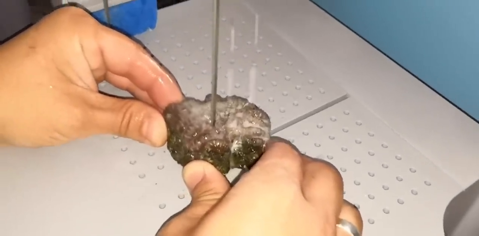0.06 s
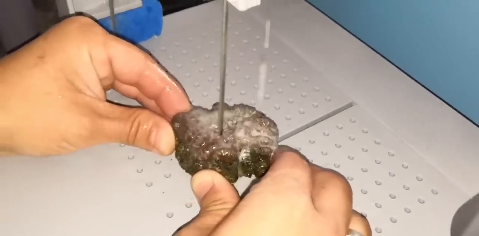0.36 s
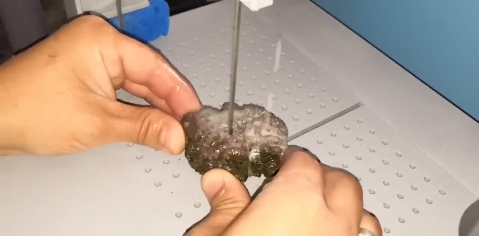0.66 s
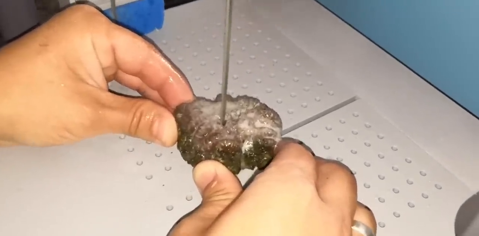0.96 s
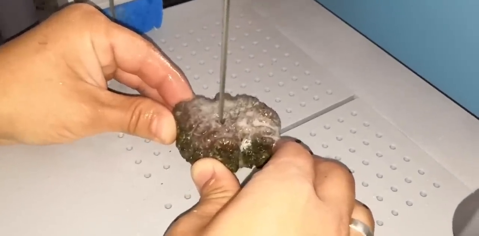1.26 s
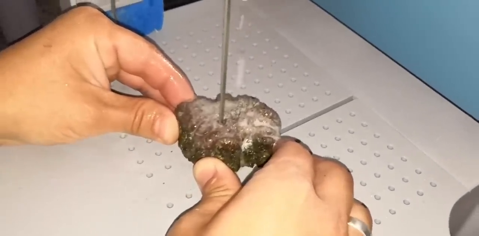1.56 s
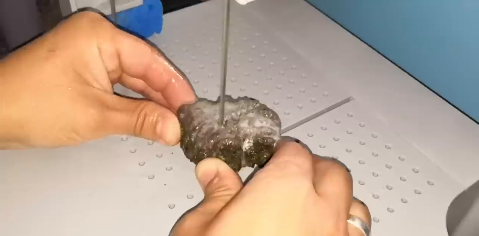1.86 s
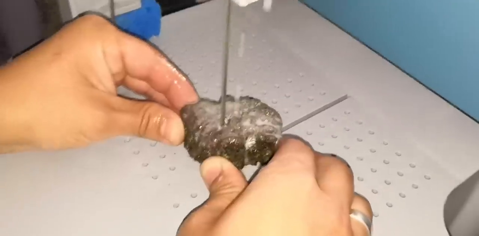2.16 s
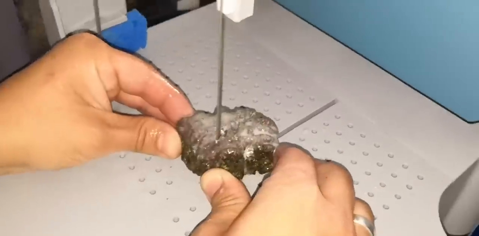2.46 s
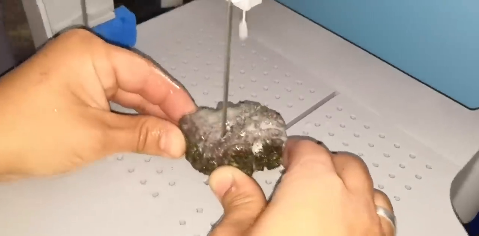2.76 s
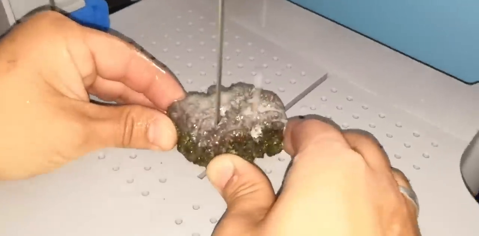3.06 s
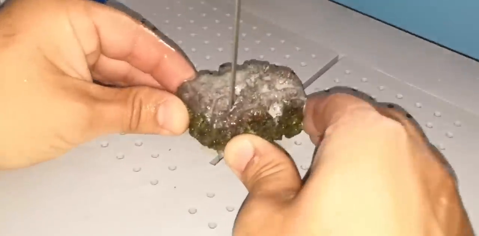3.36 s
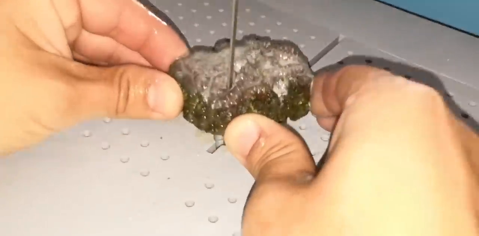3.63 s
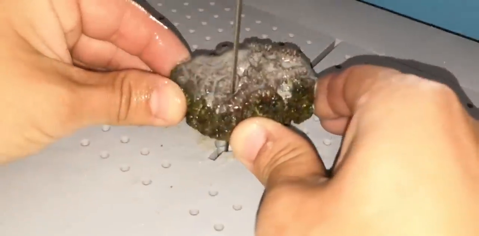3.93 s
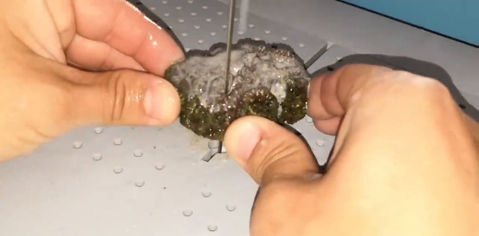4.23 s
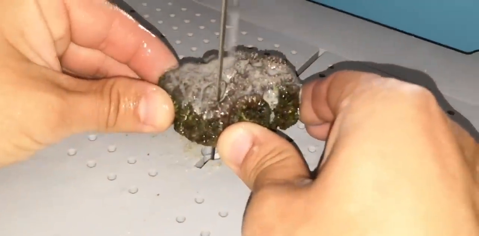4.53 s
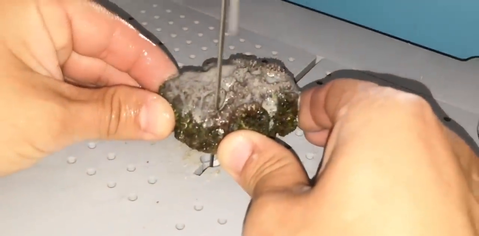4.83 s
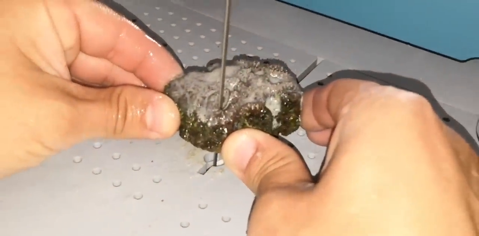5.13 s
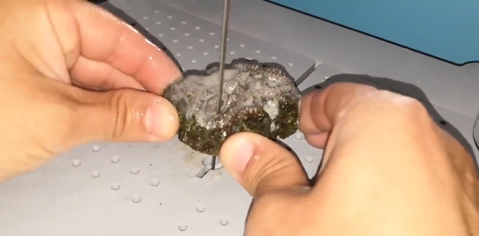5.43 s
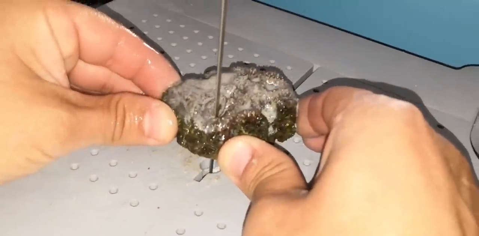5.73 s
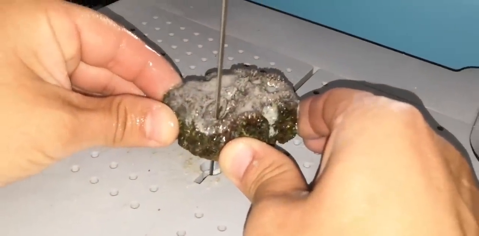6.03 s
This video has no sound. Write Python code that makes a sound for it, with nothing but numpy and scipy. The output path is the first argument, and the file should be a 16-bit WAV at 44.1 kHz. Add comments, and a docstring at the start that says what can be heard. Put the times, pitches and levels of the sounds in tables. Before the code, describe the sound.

Continuous gritty hiss of a water-cooled bandsaw cutting a piece of coral, with a pulsing low hum underneath.

```python
"""A water-cooled diamond bandsaw grinds through a piece of coral that two hands feed along the table. The band
laps ten to eleven times a second: its kinks shake the frame into a throbbing drone, and its high spots make the
gritty grinding hiss flutter. Band, coral and table ring in the hiss, whose colour changes as the band enters
and bites, and once more later on. Behind it sit the rumble of the housing, a faint spray of cooling water and
the hum of the motor."""
import sys
import numpy as np
from scipy import signal
from scipy.fft import rfft, irfft, next_fast_len
from scipy.io import wavfile
from scipy.ndimage import uniform_filter1d

SR = 44100
rng = np.random.default_rng(int(sys.argv[2]) if len(sys.argv) > 2 else 0)


def master_out(mix):
    """Clip the mix to full scale and print it as 16-bit PCM to the path in sys.argv[1]."""
    frames = np.transpose(np.atleast_2d(mix))
    ceiling = np.clip(frames, -1, 1)
    pcm = np.round(ceiling * 32767).astype(np.int16)
    wavfile.write(sys.argv[1], SR, pcm)


N = 277423
TIME = np.arange(N) / SR
FFT_SIZE = next_fast_len(N)
BINS_HZ = np.maximum(np.arange(FFT_SIZE // 2 + 1) * SR / FFT_SIZE, 1)

# partials of the motor hum: (harmonic number, rms level [dB])
HUM_PARTIALS = [(1, -60), (4, -70), (6, -66)]
# tone of the water spraying off the band: (frequency [Hz], relative level [dB])
SPRAY_EQ = [(1500, -10), (5000, 4.5), (9500, -32), (11300, 2), (15000, 0)]
# tone of the housing's rumble: (frequency [Hz], relative level [dB])
HOUSING_EQ = [(20, -19), (45, -18.5), (75, -15), (115, -16), (145, -2), (185, 3), (235, -1), (270, -7),
              (310, 2.5), (350, -11.5), (420, -48), (900, -48)]
# speed of the band: (time [s], speed [laps/s])
BAND_SPEED = [(0.0, 9.806), (0.28, 10.077), (1.39, 10.152), (1.95, 9.828), (2.33, 10.549), (2.44, 10.458),
              (3.8, 11.471), (4.09, 11.184), (5.67, 11.01), (6.29, 11.127)]
# how hard the feed shakes the saw, a fader on drone and rumble: (time [s], relative level [dB])
FEED_FADER = [(0, -38.5), (1.4, -37), (1.95, -38.5), (2.15, -37.5), (2.3, -35), (2.8, -37), (3.36, -39),
              (3.7, -38), (3.96, -36), (4.71, -36.5), (5.3, -34.5), (5.95, -41), (6.29, -38)]
# kinks in the band that push the frame: (position [laps], entering [dB], biting [dB], deep [dB])
BAND_KINKS = [(.121, .8, -2.6, -5.3), (.146, .2, -1.7, -2.8), (.235, -12.9, -9.2, -15.8),
              (.497, -14.3, -10.2, -4.8), (.593, -19.8, -8.6, -5.3), (.713, -45, -11.5, -18.6),
              (.787, -12.3, -18.4, -14.1)]
# ringing modes of the saw's frame: (frequency [Hz], width [Hz], relative level [dB])
FRAME_MODES = [(165, 37.8, -9.4), (186.9, 14.6, 0), (231.9, 14, -13), (305, 29.7, -20.5)]
# spots on the band that rub harder: (position [laps], width [laps], entering [dB], biting [dB], deep [dB])
BAND_HIGH_SPOTS = [(.27, .05, 2.9, 2.7, 3.9), (.5, .03, 2.0, 1.8, 3.0), (.67, .05, .4, 2.4, 2.9),
                   (.78, .04, 1.9, .7, 1.3)]
# fader on the grinding hiss: (time [s], level [dB])
HISS_FADER = [(0, -35), (.35, -35), (.92, -35), (1.46, -35), (1.54, -34.5), (1.97, -35), (2.1, -35),
              (2.4, -34.5), (2.9, -33.5), (3.8, -35), (4.1, -34.5), (4.7, -35.2), (6.29, -34.5)]
# base tone of the wet grinding: (frequency [Hz], left relative level [dB], right relative level [dB])
GRINDING_EQ = [(452, -17, -13), (483, -18, -16), (506, -11, -11.5), (765, -13.5, -16), (814, -31, -22.5),
               (1020, -22, -20.5), (1340, -25, -17), (1590, -23.5, -19), (3260, -17, -19), (3620, -16, -14),
               (4890, -8, -8), (5350, -14, -13), (6520, -14.5, -7), (8000, -18, -12.5), (9390, -12, -14),
               (10540, -22.5, -31), (11250, -24, -29), (15000, -30, -34)]
# stereo image of the grinding between the resonances: (frequency [Hz], left-right correlation)
GRINDING_IMAGE = [(340, 0.63), (440, -0.0023), (780, 0.025), (1000, -0.39), (1450, 0.95), (2000, 0.4),
                  (3450, 0.11), (4300, 0.02)]
# resonances and hollows of band, coral and table, one set as the band enters, one as it bites, one for the
# later colour: (frequency [Hz], width [Hz], left gain [dB], right gain [dB], left-right correlation)
ENTERING_RESONANCES = [(650, 87, 0.8, 7.5, 0.27), (984, 100, -7, -13.5, 0.44), (1050, 236, 8, 14, 0.72),
                       (1240, 190, 10.5, 3.5, 0.72), (1700, 87, 9.5, 13, 0.15),
                       (2216, 610, 7.5, 8.5, -0.061), (2554, 110, 5.5, 17, 0.57),
                       (2930, 452, 6.5, 2.2, 0.2), (3410, 61, 1.5, 8, 0.46), (4390, 117, -13, 8.5, -0.03),
                       (5030, 860, -3, 0, 0.01), (5680, 670, -0.5, 14, 0.41), (6750, 470, 8, 2, 0.04),
                       (7470, 610, 5.8, 9.5, -0.07), (8860, 820, 6.5, 3, 0.065),
                       (9040, 450, -1, -13, -0.16), (10464, 380, 7.5, 11, -0.06)]
BITING_RESONANCES = [(700, 340, 0.1, 4, 0.13), (842, 128, 3.5, -1.5, -0.21), (1167, 290, 8.5, 3.5, 0.75),
                     (1685, 110, 8, 12.5, 0.03), (2185, 800, 10, 9, -0.23), (2526, 195, 5.5, 15, -0.018),
                     (3983, 170, -3, 6.5, -0.17), (4500, 90, 0.7, 7, 0.21), (4880, 1200, -3.5, -3, 0.15),
                     (5670, 1070, 5, 15.5, -0.047), (6380, 790, -3, -8, -0.13), (7170, 1130, 17, 15, -0.1),
                     (7140, 300, -11, -8, -0.03), (8700, 440, 9.5, -4, 0.05), (10500, 882, 11, 3, -0.03)]
LATE_RESONANCES = [(814, 203, 7.5, -8.5, -0.29), (880, 670, 4.5, 13.5, -0.35), (1220, 170, -1, 0, 0.76),
                   (1680, 30, -18, -7.5, 0.22), (1525, 1130, 11.5, 2, 0.25), (1680, 120, 2, 14, -0.56),
                   (2300, 340, 9, 13.5, 0.094), (2581, 153, 15.0, 16.5, -0.6), (2888, 200, 1, 3.6, 0.17),
                   (3410, 350, 2.5, 10, -0.042), (3710, 108, -2.0, -3, -0.16), (4130, 210, -3, 9, -0.32),
                   (4660, 177, 2.5, -1.5, 0.011), (5000, 130, -19, -3, -0.2), (5270, 390, 10, 8.5, -0.1),
                   (5845, 600, 8.8, 12, 0.00076), (7010, 440, 8, 8, -0.55), (7710, 830, 13.5, 10, -0.0095),
                   (8695, 380, 10.5, -3, 0.078), (9400, 281, 5.5, 0, -0.1), (10563, 720, 13.5, 4.5, -0.17)]
# resonances that ring in spurts: (frequency [Hz], width [Hz], depth [dB], rate [Hz])
CHATTER_BANDS = [(1700, 200, 2.5, 14), (2560, 340, 3.0, 34), (4450, 320, 2.5, 14), (5750, 800, 2.5, 24),
                 (7150, 1100, 2.5, 24)]
# single resonances swell or sink: (peak time [s], spread [s], frequency [Hz], width [Hz], gain [dB])
RESONANCE_RIDES = [(1.38, 0.19, 1100, 280, 5.5), (1.7, 0.22, 1200, 410, -4), (1.573, 0.056, 7450, 700, 4.5),
                   (1.9, 0.064, 2560, 220, 5), (2.145, 0.065, 4900, 420, 4), (3, 0.042, 6400, 480, 2),
                   (3.7, 0.33, 3350, 700, 2.5), (2.13, 0.09, 3200, 400, -4), (5.05, .5, 610, 59, 6.5),
                   (0.24, .03, 2560, 220, 5.5), (1.2, 0.024, 2560, 220, 9), (3.7, .45, 6800, 430, 1.5),
                   (5, 0.97, 1460, 110, 5)]

# crossfades: the band starts to bite; later the ringing of the hiss changes colour; the drone deepens: (start
# [s], length [s])
BITE, RING_CHANGES, SHAKE_DEEPENS = (1.89, 0.31), (3.2, 0.85), (2.7, 0.38)
# trims at each stage: (entering [dB], biting [dB], deep [dB])
RUMBLE_DB, ROAR_DB = (-9.5, -13, -11.5), (2, -0.5, -2.5)
TONE_DB, THROB_DB = (2, 2.5, -1), (1, -2, 1)


def from_db(db):
    """Decibels to gain."""
    return np.exp(np.asarray(db) * (np.log(10) / 20))


def unit_rms(x):
    """Scale to rms 1."""
    return x / np.sqrt(np.mean(x ** 2) + 1e-20)


def automation(rows):
    """A breakpoint curve at every sample."""
    return np.interp(TIME, *np.transpose(rows))


def spectrum(rows):
    """Each column of a frequency table at every bin."""
    hz, *columns = np.transpose(rows)
    return np.array([np.interp(np.log(BINS_HZ), np.log(hz), column) for column in columns])


def equalise(x, db):
    """Filter by a gain in dB for each frequency bin."""
    return irfft(rfft(x, FFT_SIZE) * from_db(db), FFT_SIZE)[..., :N]


def isolate(x, hz, width_hz):
    """Flat-topped band-pass around one resonance."""
    return equalise(x, -20 * np.log10(1 + (2 * (BINS_HZ - hz) / width_hz) ** 4))


def low_share(corner_hz):
    """A weight that falls from 1 in the bass through 1/2 at the corner."""
    return 1 / (1 + (BINS_HZ / corner_hz) ** 2)


def crossover(low, high, share):
    """Equal-power blend of two unrelated noises; share is the first one's part in each bin."""
    share = np.clip(share, 1e-6, 1 - 1e-6)
    return equalise(low, 10 * np.log10(share)) + equalise(high, 10 * np.log10(1 - share))


def stereo_image(noises, correlation, db):
    """Use two unrelated noises as mid and side, with a correlation and an EQ across frequency."""
    correlation = np.clip(correlation, -.99, .99)
    first, second = rfft(noises, FFT_SIZE)
    mid = first * np.sqrt((1 + correlation) / 2)
    side = second * np.sqrt((1 - correlation) / 2)
    return irfft(np.array([mid + side, mid - side]) * from_db(db), FFT_SIZE)[:, :N]


def drift(rate_hz):
    """Smooth random modulation of rms 1: noise at every 40th sample through two one-pole low-passes."""
    pole = np.exp(-2 * np.pi * rate_hz * 40 / SR)
    noise = rng.standard_normal(N // 40 + 2002)
    slow = signal.lfilter([1], [1, -2 * pole, pole * pole], noise)[2000:]   # once the filter has settled
    return np.interp(np.arange(N) / 40, np.arange(len(slow)), unit_rms(slow))


def bump(offset, spread):
    """A Gaussian swell of height 1."""
    return np.exp(-.5 * (offset / spread) ** 2)


def ramp(start_s, length_s):
    """Glide from 0 to 1 over a span of time."""
    return np.clip((TIME - start_s) / length_s, 0, 1)


def by_stage(stage, values):
    """Glide between the values for entering (0), biting (1) and deep (2)."""
    return np.interp(stage, np.arange(len(values)), values)


def motor_hum(hz=101, waver_db=1.6):
    """The motor hums at twice the mains rate, with faint overtones, and wavers a little."""
    hum = sum(from_db(db) * np.sqrt(2) * np.sin(2 * np.pi * harmonic * hz * TIME)
              for harmonic, db in HUM_PARTIALS)
    return hum * from_db(waver_db * drift(rate_hz=9))


def water_spray(level_db=-54):
    """Cooling water leaves the band as a faint, even hiss."""
    return from_db(level_db) * unit_rms(equalise(rng.standard_normal((2, N)), spectrum(SPRAY_EQ)))


def housing_rumble(stage):
    """The shaken housing lays a bed of low, nearly centred noise under the drone."""
    rumble = stereo_image(rng.standard_normal((2, N)), correlation=0.74, db=spectrum(HOUSING_EQ))
    return from_db(by_stage(stage, RUMBLE_DB)) * unit_rms(rumble)


def kink_pushes(laps, stage, uneven_db=0.96, jitter_s=0.00011):
    """Each kink knocks the frame once a lap, never quite alike in timing or weight."""
    pushes = np.zeros(N)
    for position, *levels_db in BAND_KINKS:
        passes = np.arange(int(laps[-1] - position) + 1) + position
        times_s = np.interp(passes, laps, TIME)
        late, harder = rng.standard_normal((len(times_s), 2)).T
        at = np.clip(((times_s + jitter_s * late) * SR).astype(int), 0, N - 1)
        pushes[at] += from_db(by_stage(stage[at], levels_db) + uneven_db * harder)
    return pushes


def frame_ring(pushes, low_hz=127, high_hz=256, mount_limit=2.0):
    """The frame's modes ring on from push to push, overlapping and beating into a throb."""
    ring = np.zeros(N)
    for k, (hz, width_hz, db) in enumerate(FRAME_MODES):
        mode = signal.lfilter(*signal.iirpeak(hz, hz / width_hz, fs=SR), pushes)
        ring += (-1) ** k * from_db(db) * mode
    ring = np.tanh(unit_rms(ring) / mount_limit)   # the mounts soft-clip the widest swings
    skirts = (low_hz / BINS_HZ) ** 12 + (BINS_HZ / high_hz) ** 12
    return unit_rms(equalise(ring, -10 * np.log10(1 + skirts)))


def frame_drone(laps, stage, harmonic=17, build_s=0.27):
    """The frame throbs, and a lap harmonic near its main mode holds a steady tone, firmest in the bite."""
    rocking = unit_rms(from_db(0.51 * drift(rate_hz=36)))   # the coral rocks on the table
    ring = frame_ring(kink_pushes(laps, stage))
    carrier = np.exp(2j * np.pi * harmonic * laps)
    # a narrow band-pass that tracks the harmonic
    tone = 2 * np.real(carrier * uniform_filter1d(ring / carrier, size=int(build_s * SR)))
    throb = ring - tone
    return rocking * (tone * from_db(by_stage(stage, TONE_DB)) + throb * from_db(by_stage(stage, THROB_DB)))


def contact_pressure(laps, stage, uneven=0.35, flutter_db=1.0):
    """High spots rub through the cut once a lap, never twice with quite the same force."""
    db = np.zeros(N)
    for position, width, *levels_db in BAND_HIGH_SPOTS:
        laps_away = (laps - position + .5) % 1 - .5
        db += by_stage(stage, levels_db) * bump(laps_away, width)
    db *= 1 + uneven * np.tanh(drift(rate_hz=1.6))
    db += flutter_db * np.tanh(drift(rate_hz=40))
    return unit_rms(from_db(db))


def grit(clicks_per_s=13000, spread_db=2.0, click_share=0.071):
    """Diamond grains chip the coral in dense tiny clicks over the smooth hiss of the slurry."""
    sizes = from_db(spread_db * np.minimum(rng.exponential(1, N), 4))
    struck = rng.random(N) < clicks_per_s / SR
    clicks = unit_rms(sizes * struck * rng.standard_normal((2, N)))
    return np.sqrt(click_share) * clicks + np.sqrt(1 - click_share) * rng.standard_normal((2, N))


def coating(laps, points=4096):
    """The coarse relief of the diamond coating is a noise loop that returns every lap."""
    relief = rng.standard_normal((2, points))
    return np.array([np.interp(laps % 1 * points, np.arange(points), side) for side in relief])


def scraping(laps, pressure, loop_share=0.49, slosh_db=1.5):
    """Coating rumbles low, slurry swishes in the mids, chipping under pressure fills the treble."""
    chips = pressure * grit()
    slurry = from_db(slosh_db * drift(rate_hz=23)) * rng.standard_normal((2, N))
    wet_grit = crossover(unit_rms(slurry), chips, low_share(corner_hz=3100))
    return crossover(pressure * coating(laps), wet_grit, loop_share * low_share(corner_hz=1200))


def reflections(x, level_db=-18, decay_s=0.011, above_hz=900, taps=800):
    """Table, guard and hands scatter the treble back as tight early reflections."""
    echoes = rng.standard_normal((2, taps)) * np.exp(-np.arange(taps) / SR / decay_s)
    echoes /= np.linalg.norm(echoes, axis=1, keepdims=True)
    scattered = signal.fftconvolve(x, echoes, axes=1)[:, :N]
    return x + equalise(scattered, level_db - 10 * np.log10(1 + (above_hz / BINS_HZ) ** 2))


def chatter(force):
    """The band grabs and lets go, so several resonances ring in spurts of their own."""
    for hz, width_hz, depth_db, rate_hz in CHATTER_BANDS:
        spurts = unit_rms(from_db(depth_db * np.tanh(drift(rate_hz))))
        force = force + isolate(force, hz, width_hz) * (spurts - 1)
    return force


def resonate(force, resonances, eq_db):
    """Band, coral and table add bell-shaped peaks and hollows, each with its own stereo width."""
    correlation, = spectrum(GRINDING_IMAGE)
    for hz, width_hz, left_db, right_db, own_correlation in resonances:
        detune = 2 * (BINS_HZ - hz) / width_hz
        eq_db = eq_db + np.outer([left_db, right_db], 1 / (1 + detune ** 2))
        correlation += (own_correlation - correlation) * bump(detune, 1)
    return stereo_image(force, correlation, eq_db)


def ride_resonances(hiss):
    """Single resonances in the hiss swell or sink, some in brief flares, some over seconds."""
    out = hiss.copy()
    for peak_s, spread_s, hz, width_hz, db in RESONANCE_RIDES:
        gain = from_db(db * bump(TIME - peak_s, spread_s))
        out += isolate(hiss, hz, width_hz) * (gain - 1)
    return out


def bite_glare(hiss, peak_s=1.82, spread_s=0.32, boost_db=4.5, above_hz=8600):
    """The top end brightens as the band starts to bite, then falls back."""
    top = equalise(hiss, -20 * np.log10(1 + (above_hz / BINS_HZ) ** 6))
    gain = from_db(boost_db * bump(TIME - peak_s, spread_s))
    return hiss + top * (gain - 1)


def grinding_hiss(laps, stage, low_cut_hz=280, roar_hz=1500):
    """The scrape rings band, coral and table; one set of resonances crossfades into the next."""
    pressure = contact_pressure(laps, stage)
    force = chatter(reflections(scraping(laps, pressure)))
    base_db = spectrum(GRINDING_EQ) - 20 * np.log10(1 + (low_cut_hz / BINS_HZ) ** 4)
    hiss = np.zeros((2, N))
    for k, resonances in enumerate([ENTERING_RESONANCES, BITING_RESONANCES, LATE_RESONANCES]):
        layer = resonate(force, resonances, base_db + ROAR_DB[k] * low_share(roar_hz))
        fade = np.maximum(1 - abs(stage - k), 0)
        hiss += fade * layer / np.std(layer.mean(axis=0))
    return bite_glare(ride_resonances(from_db(automation(HISS_FADER)) * hiss))


def scene(drone_trim_db=-1):
    """The mix: grinding and spray spread wide, drone, rumble and hum near the centre."""
    laps = np.cumsum(automation(BAND_SPEED)) / SR
    ring_stage = ramp(*BITE) + ramp(*RING_CHANGES)
    shake_stage = ramp(*BITE) + ramp(*SHAKE_DEEPENS)
    hiss = grinding_hiss(laps, ring_stage)
    drone = from_db(drone_trim_db) * frame_drone(laps, shake_stage)
    low_end = from_db(automation(FEED_FADER)) * (drone + housing_rumble(shake_stage))
    pan = from_db([[-.2], [.2]])   # a touch to the right
    return hiss + pan * low_end + water_spray() + motor_hum()


def record(dry, cutoff_hz=15000):
    """A steep low-pass takes the air off the mix."""
    return signal.sosfilt(signal.ellip(12, .1, 80, cutoff_hz, fs=SR, output="sos"), dry)


dry = scene()
out = record(dry)
master_out(out)
```